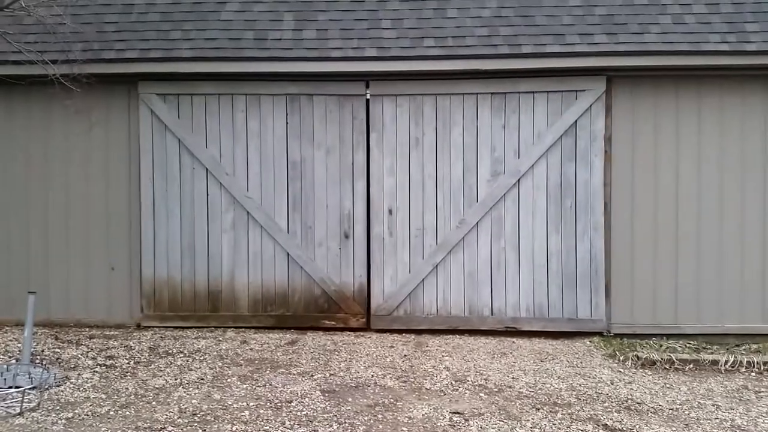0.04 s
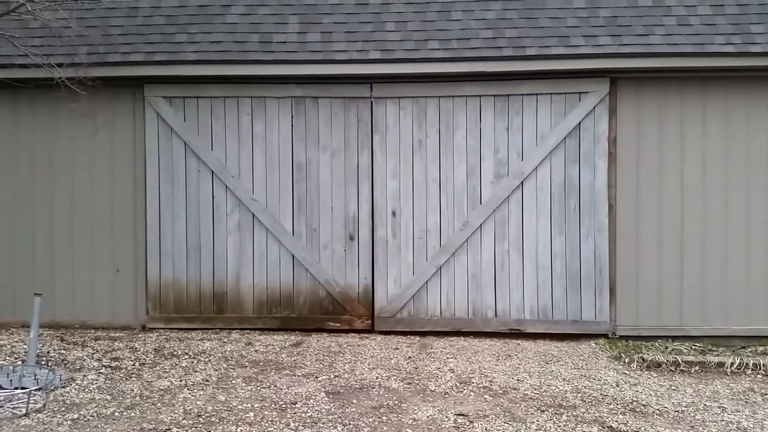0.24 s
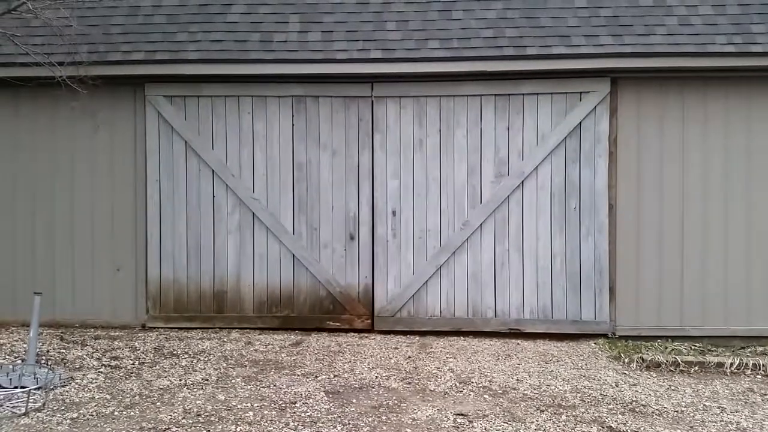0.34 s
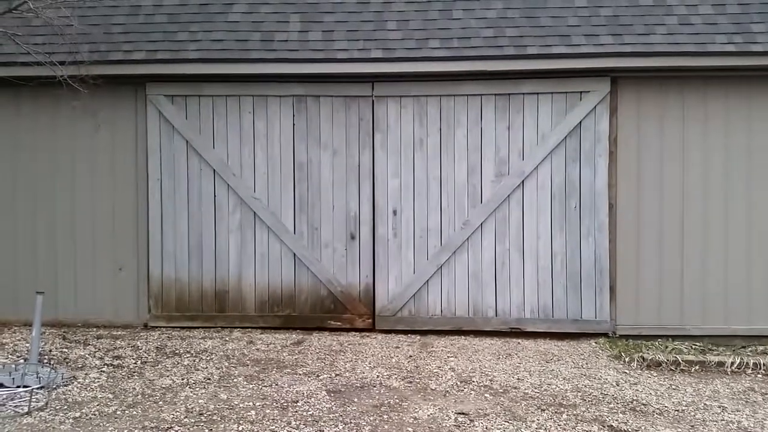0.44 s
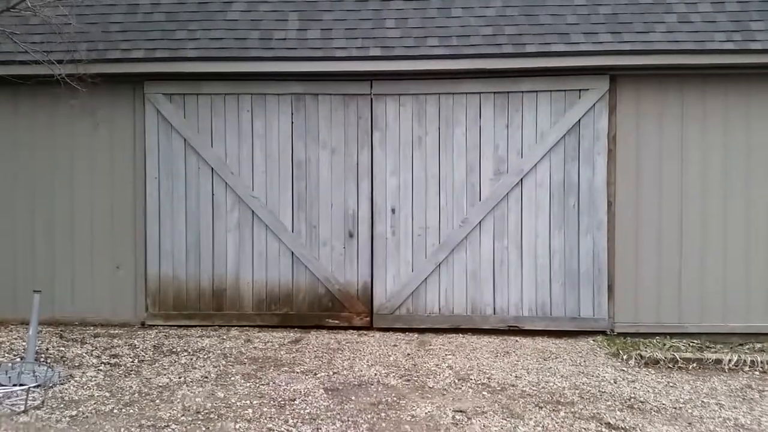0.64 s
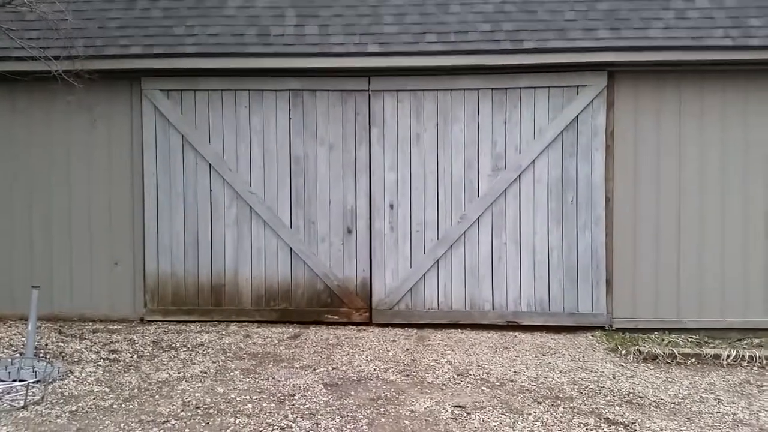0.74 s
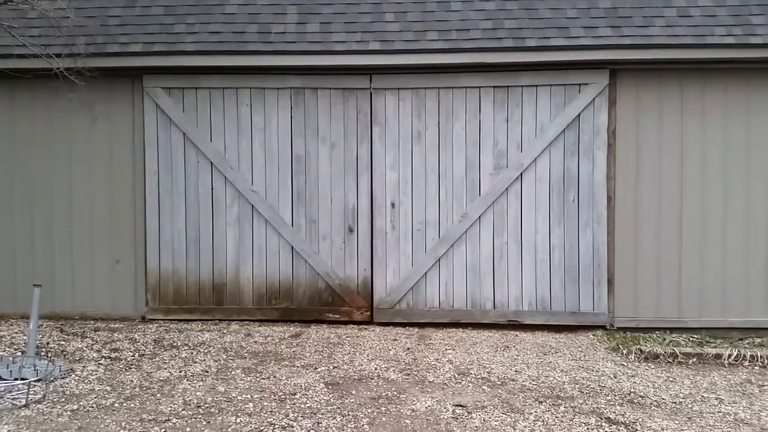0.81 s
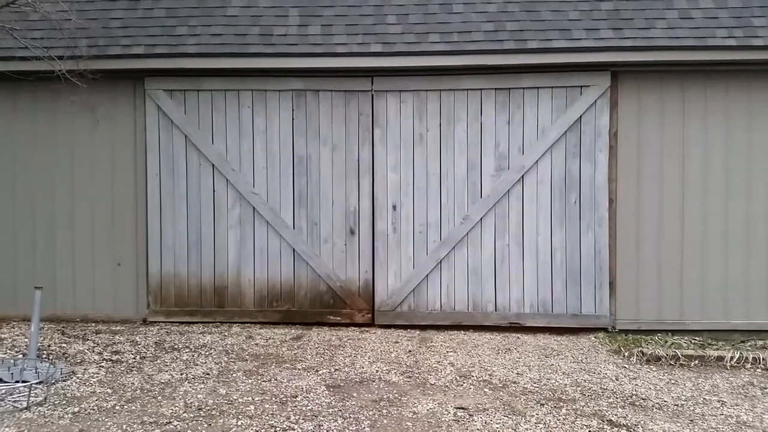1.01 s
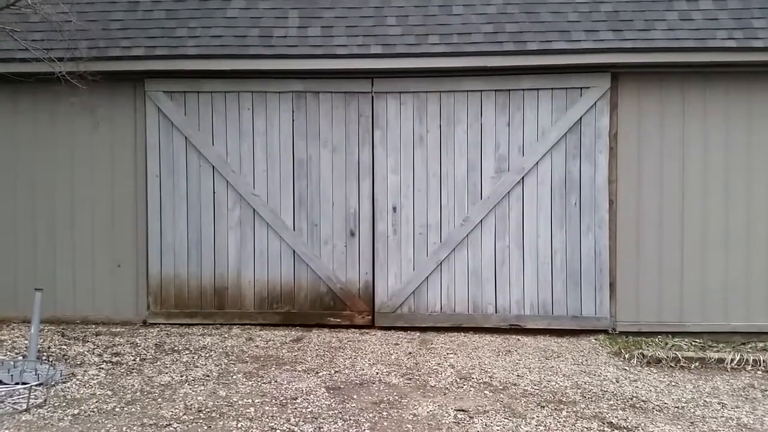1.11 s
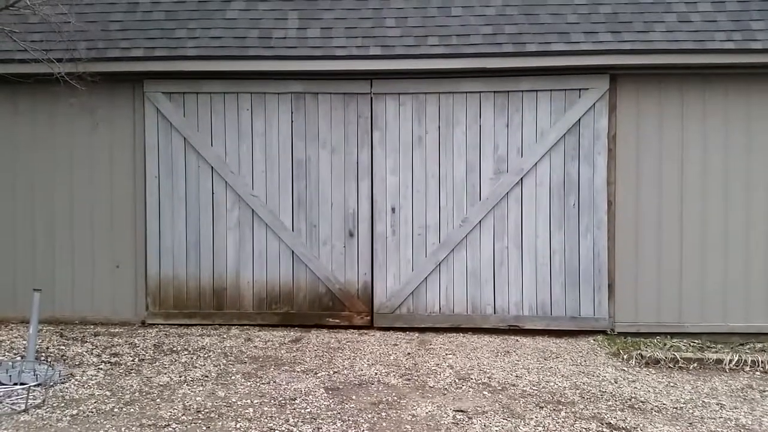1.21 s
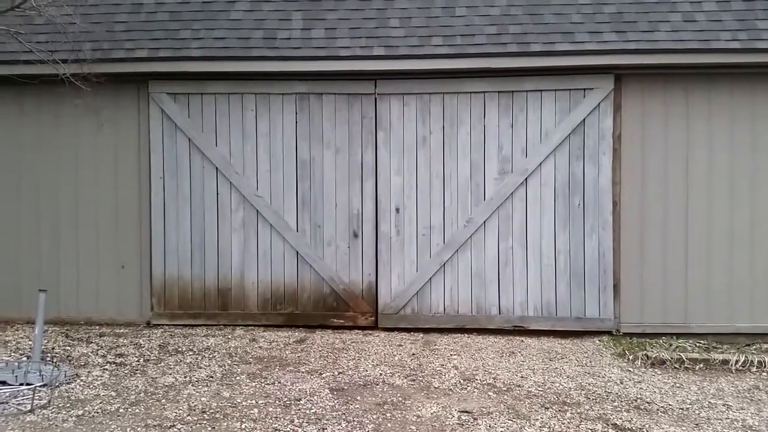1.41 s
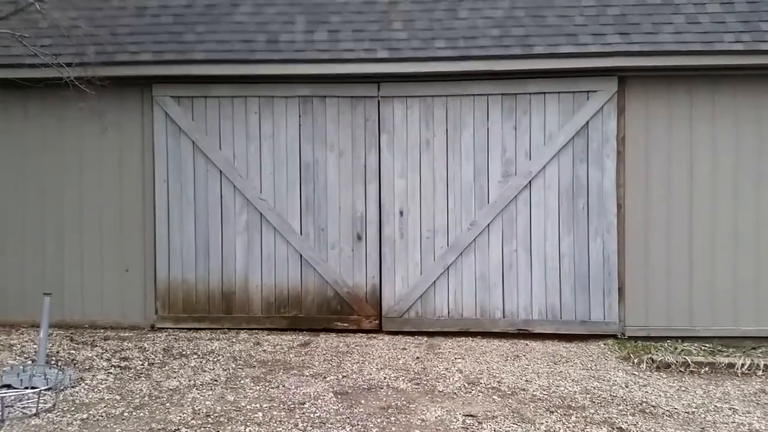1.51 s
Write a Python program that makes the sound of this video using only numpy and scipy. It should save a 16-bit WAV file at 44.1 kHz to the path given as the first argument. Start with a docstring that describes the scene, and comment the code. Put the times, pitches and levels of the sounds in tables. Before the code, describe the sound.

Two wooden sliding doors roll briefly and meet with a hollow double thump, heard outdoors from a few metres. The shed booms and the doors bump lightly, then a quiet low rush continues with two faint bird notes.

```python
"""Two plank doors roll shut on a wooden shed, heard outdoors from a few metres. The leaves meet with a hollow
knock (edge and panel modes), then sway and bump on their track. Rollers hum, hiss and squeak until then; the
leaves scrape in tiny slips; metal hangers tick. The shed booms after the knock. Behind: a faint high rustle,
two bird notes and background noise (a low rush like distant traffic, with a faint high hiss)."""
import sys
import numpy as np
from scipy import signal
from scipy.fft import rfft, irfft
from scipy.io import wavfile
from scipy.ndimage import uniform_filter1d

SR = 44100
rng = np.random.default_rng(int(sys.argv[2]) if len(sys.argv) > 2 else 0)


def to_wav(s):
    """Save 16-bit WAV."""
    ch = np.atleast_2d(s).T  # columns
    pcm = np.round(np.clip(ch, -1, 1) * 32767)  # PCM
    wavfile.write(sys.argv[1], SR, pcm.astype(np.int16))


N = 68355
T = np.arange(N) / SR

# door blows (time [s], edge gain [dB], thud gain [dB], ring gain [dB], thud low-pass [Hz])
BLOWS = [(0.2205, -30, -20, -45, 500), (0.2951, -14.5, -9, -27.5, 1400), (0.320, -45, -23, -46.5, 800),
         (0.347, -45, -28, -37.5, 900), (0.483, -42, -28, -43.5, 1200), (0.574, -45, -31.5, -51.5, 1000),
         (0.629, -55, -37, -49.5, 450), (0.713, -58, -37, -59, 450)]
# edge boards, dead panel thud, lasting panel ring (frequency [Hz], gain [dB], t60 [s])
EDGE_MODES = [(887, -10.5, 0.043), (1083, -3.5, 0.026), (1211, -4, 0.023), (1320, -22, 0.034),
              (2360, -19.5, .02), (3300, -38, .012)]
THUD_MODES = [(275.5, -1.5, 0.041), (420, -3, 0.0093), (596, -11, 0.047)]
PANEL_MODES = [(152, -26, 0.28), (210.9, -3.5, 0.51), (282.2, 3.5, 0.228), (317.1, -2.5, .45),
               (353.4, -2.5, 0.18), (450, -10, 0.46), (489, -30, 0.26), (539, -11, 0.38), (596, -13, 0.46),
               (679.4, -12, 0.35), (1041, -19, 0.2), (1185, -21, .14), (1372, -8.5, 0.12)]
# swings against the wall (time [s], level [dB], pitch [Hz], rise [s])
SWAYS = [(0.240, -39.5, 73.6, 0.01), (0.338, -39.5, 152, 0.014), (0.361, -29, 202, 0.017),
         (0.408, -43.5, 80, 0.03), (0.451, -48, 60, 0.011), (0.483, -34, 130, 0.01),
         (0.495, -38.5, 235.3, 0.015), (0.573, -40, 135.4, 0.022), (0.617, -41.5, 116, 0.032),
         (0.622, -38.5, 196, 0.0087), (0.691, -43, 64.4, 0.0078), (0.759, -39, 143.5, 0.0086)]
# rubs between the leaves (time [s], length [s], level [dB])
SCRAPES = [(0.215, 0.03, -38.5), (0.236, 0.02, -37), (0.25, 0.013, -32)]
# scraped wood (frequency [Hz], gain [dB], t60 [s])
SCRAPE_MODES = [(539, -7, 0.23), (1000, -1.5, 0.0078), (1520, -5.5, 0.018), (1986, -0.5, 0.012),
                (2620, -1, 0.0073), (3330, -0.5, 0.0053), (4300, -8.5, 0.0032), (7140, -4, .005)]
# hanger ticks (time [s], level [dB], decay [s])
TICKS = [(0.31, -45.5, 0.053), (0.319, -41.5, 0.019), (0.3405, -34.5, 0.0034)]
# roller squeak, bird notes (time [s], length [s], level [dB], pitch [Hz])
SQUEAKS = [(0.237, 0.036, -54.5, 5664)]
BIRD_NOTES = [(1.135, 0.044, -62, 3210), (1.315, .115, -63, 3000)]
# shed boom (frequency [Hz], gain [dB], t60 [s])
BOOM_BANDS = [(35, -14, 1.5), (60, -7.5, 2), (114, -0.5, 2.33), (244, 3, 0.79), (394, -1.5, 0.74),
              (644, -4, 0.52), (1130, -4, 0.24), (2360, -10.5, 0.18), (4080, -19, 0.43),
              (6400, -32.5, 0.49), (7650, -24.5, 0.56), (14000, -39, 0.78)]
# noise spectra (frequency [Hz], gain [dB])
RUMBLE_SPECTRUM = [(40, -18), (110, 10.5), (300, -8.5), (500, -5), (880, 1.5), (1300, -8), (2000, -36),
                   (3800, -7), (5500, -24.5), (14000, -23)]
HISS_SPECTRUM = [(3000, -8), (5500, -19), (7500, 4.5), (8800, -4), (10500, 10.5), (14500, 2)]
TICK_SPECTRUM = [(2000, 8.5), (4000, 4), (6000, 3.5), (8000, -0.5), (11000, 16), (14500, 5)]
RUSTLE_SPECTRUM = [(7000, -40), (9500, -17), (10700, 17), (12000, -16), (14500, -16)]
# background filter: low rush, faint high hiss; the 8640 Hz notch is part of neither
# (frequency [Hz], gain [dB])
BACKGROUND_EQ = [(18, -23), (30, -46), (52, -3.5), (124, -2.5), (263, -12), (324, -13.5), (359, -13),
                 (465, -15), (543, -10), (865, -2), (2200, -10), (2990, -15), (6020, -38), (7800, -34),
                 (8640, -69), (9840, -25), (14500, -23)]
# background envelope (time [s], level [dB])
BACKGROUND_LEVEL = [(0, -44.5), (.4, -42.5), (.75, -44), (1.05, -46.5), (1.55, -47.5)]
# stereo image of doors and background (frequency [Hz], left minus right [dB])
DOOR_BALANCE = [(100, 1), (380, 4), (700, 4), (1300, 9.5), (2400, 18), (4400, 9), (8000, 11), (14000, -2)]
AIR_BALANCE = [(60, 4.5), (380, 3.5), (1200, 4), (2400, 4.5), (4400, 6), (8000, -0.5), (14000, 1.5)]
# stereo noise (frequency [Hz], left-right correlation [0..1])
COHERENCE = [(60, 1), (300, 0.65), (800, 0.7), (1500, 0.74), (3000, 0.067), (8000, 0.018)]


def door_blows(ground_lag_s=0.0056, ground_db=2, bending_lag_s=0.003023, edge_trim_db=-5.5):
    """Blows knock the edge boards; a bending wave spreads, and the panel thuds and rings."""
    times_s, edge_db, thud_db, ring_db, lowpass_hz = np.transpose(BLOWS)
    edge_force = bandpass(impulses(times_s, edge_db), 800, 3560)
    edge_force += from_db(ground_db) * delayed(edge_force, ground_lag_s)   # echo off the gravel
    panel_times_s = times_s + bending_lag_s
    thud_force = sum(bandpass(-impulses([at_s], [db]), 130, hz)   # softer contact, duller thud
                     for at_s, db, hz in zip(panel_times_s, thud_db, lowpass_hz))
    panel = ring(thud_force, THUD_MODES) + ring(impulses(panel_times_s, ring_db), PANEL_MODES)
    bass_cut = signal.butter(3, 160, "high", fs=SR, output="sos")
    return from_db(edge_trim_db) * ring(edge_force, EDGE_MODES) + signal.sosfilt(bass_cut, panel)


def door_sways():
    """Leaves swing against the wall; low notes swell and fade."""
    out = 0
    for start_s, db, hz, rise_s in SWAYS:
        age_s = np.maximum(T - start_s, 0)
        swell = from_db(db) * age_s / rise_s * np.exp(1 - age_s / rise_s)
        out += swell * np.sin(2 * np.pi * hz * age_s) * door_pan(hz)
    return out


def door_scrape(slips_per_s=4500, release_s=0.012):
    """Leaves rub into line; dense slips drive the wood modes."""
    slips = (rng.random(N) < slips_per_s / SR) * rng.standard_normal(N)
    slips = bandpass(slips, 450, 12000)
    pressure = sum(from_db(db) * (T >= start_s) * fade_after(start_s + length_s - release_s, release_s)
                   for start_s, length_s, db in SCRAPES)
    return ring(slips * pressure, SCRAPE_MODES) / np.std(ring(slips, SCRAPE_MODES))


def rollers(hum_hz=236.7, hum_db=-47.5, waver_db=3.2, rumble_db=-46.5, hiss_db=-47):
    """Rollers hum, rumble and hiss on the track until the leaves meet."""
    hum_gain = from_db(hum_db + waver_db * waver(window_samples=2500))
    hum = hum_gain * np.sin(2 * np.pi * hum_hz * T) * door_pan(hum_hz)
    rumble = from_db(rumble_db) * noise(RUMBLE_SPECTRUM, DOOR_BALANCE)
    hiss = from_db(hiss_db) * noise(HISS_SPECTRUM, DOOR_BALANCE)
    hiss *= fade_after(stop_s=0.252, decay_s=0.038)
    return (hum + rumble) * fade_after(stop_s=0.32, decay_s=0.026) + hiss


def hangers():
    """A roller squeaks as the leaves rub; then metal hangers tick and rattle."""
    squeak = whistles(SQUEAKS, waver_hz=15) * pan(db=8)
    envelope = sum(from_db(db) * (T >= at_s) * fade_after(at_s, decay_s) for at_s, db, decay_s in TICKS)
    return squeak + envelope * noise(TICK_SPECTRUM, DOOR_BALANCE)


def shed_boom(start_s=0.293, rise_s=0.0065, gain_db=-29.5):
    """Walls and interior answer the main knock; lows last longest."""
    spectrum = rfft(noise(BOOM_BANDS, DOOR_BALANCE))
    age_s = np.maximum(T - start_s, 0)
    half_octave = np.round(2 * np.log2(bins_hz(floor_hz=20)))
    tail = 0
    for band in np.unique(half_octave):
        t60_s = at_hz(BOOM_BANDS, 2 ** (band / 2), column=2)
        tail += irfft(spectrum * (half_octave == band), N) * from_db(-60 * age_s / t60_s)
    return from_db(gain_db) * (1 - np.exp(-age_s / rise_s)) * tail


def rustle(peak_s=0.663, width_s=0.068, peak_db=-63.5):
    """Faint, high swell of noise once the doors are shut."""
    envelope = from_db(peak_db) * np.exp(-((T - peak_s) / width_s) ** 2)
    return envelope * noise(RUSTLE_SPECTRUM, AIR_BALANCE)


def bird():
    """Two faint, distant whistled notes."""
    return whistles(BIRD_NOTES, waver_hz=69.4)


def background(treble_hz=(1400, 4200), treble_db_per_db=0.2, right_lag_s=0.00014):
    """Distant low rush with faint high hiss, notch-filtered; leans left, dulls as it recedes."""
    level_db = np.interp(T, *np.transpose(BACKGROUND_LEVEL))
    bed = noise(BACKGROUND_EQ, AIR_BALANCE)
    treble = signal.sosfilt(signal.butter(1, treble_hz, "band", fs=SR, output="sos"), bed)
    extra_treble = from_db(treble_db_per_db * (level_db - level_db[-1])) - 1
    left, right = from_db(level_db) * (bed + extra_treble * treble)
    return np.array([left, np.roll(right, int(right_lag_s * SR))])


def ring(force, modes, right_lag_s=0.00003):
    """Force-driven damped modes, panned to the doors."""
    out = 0
    for hz, db, t60_s in modes:
        radius, angle = from_db(-60 / (t60_s * SR)), 2 * np.pi * hz / SR
        poles = [1, -2 * radius * np.cos(angle), radius ** 2]
        out += from_db(db) * door_pan(hz) * signal.lfilter([0, np.sin(angle)], poles, force + 1e-18)
    return np.array([out[0], delayed(out[1], right_lag_s)])


def whistles(notes, waver_hz, ramp_s=0.0054):
    """Thin tones, soft ends, unsteady pitch."""
    drift_hz = waver_hz * waver(window_samples=150)
    out = 0
    for start_s, length_s, db, hz in notes:
        gate = np.clip(np.minimum(T - start_s, start_s + length_s - T) / ramp_s, 0, 1)
        out += from_db(db) * gate * np.sin(2 * np.pi * np.cumsum(hz + drift_hz) / SR)
    return out


def noise(spectrum, balance):
    """Stereo noise, rms 1; coherent bass, diffuse treble."""
    hz = bins_hz(floor_hz=1)
    mid, side = rfft(rng.standard_normal((2, N)))
    coherence = np.clip(at_hz(COHERENCE, hz), -1, 1)
    stereo = np.sqrt(1 + coherence) * mid + np.sqrt(1 - coherence) * side * [[1], [-1]]
    return unit_rms(irfft(stereo * from_db(at_hz(spectrum, hz)) * pan(at_hz(balance, hz)), N))


def waver(window_samples):
    """Smoothed noise, rms 1."""
    return unit_rms(uniform_filter1d(rng.standard_normal(N), size=window_samples))


def impulses(times_s, db):
    out = np.zeros(N)
    np.add.at(out, (np.asarray(times_s) * SR).astype(int), from_db(db))
    return out


def bandpass(x, low_hz, high_hz):
    return signal.sosfilt(signal.butter(2, [low_hz, high_hz], "band", fs=SR, output="sos"), x)


def delayed(x, lag_s):
    return np.interp(T - lag_s, T, x, left=0)


def fade_after(stop_s, decay_s):
    return np.exp(-np.maximum(T - stop_s, 0) / decay_s)


def pan(db):
    """Stereo gains for a left-minus-right level."""
    return from_db(np.array([[1], [-1]]) * db / 2)


def door_pan(hz):
    return pan(at_hz(DOOR_BALANCE, hz))


def at_hz(table, hz, column=1):
    """Table lookup over log frequency."""
    table = np.array(table)
    return np.interp(np.log(hz), np.log(table[:, 0]), table[:, column])


def bins_hz(floor_hz):
    return np.maximum(np.arange(N // 2 + 1) * SR / N, floor_hz)


def from_db(db):
    return 10 ** (np.asarray(db) / 20)


def unit_rms(x):
    return x / np.sqrt(np.mean(x ** 2) + 1e-20)


def scene():
    """Doors, shed, open air."""
    doors = door_blows() + door_sways() + door_scrape() + rollers() + hangers()
    return doors + shed_boom() + rustle() + bird() + background()


def record(dry):
    """Steep low-pass."""
    cutoff_hz = 14700
    return signal.sosfilt(signal.ellip(12, .1, 80, cutoff_hz, fs=SR, output="sos"), dry)


dry = scene()
out = record(dry)
to_wav(out)
```